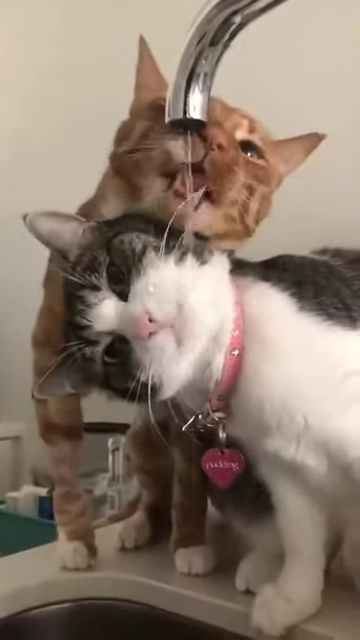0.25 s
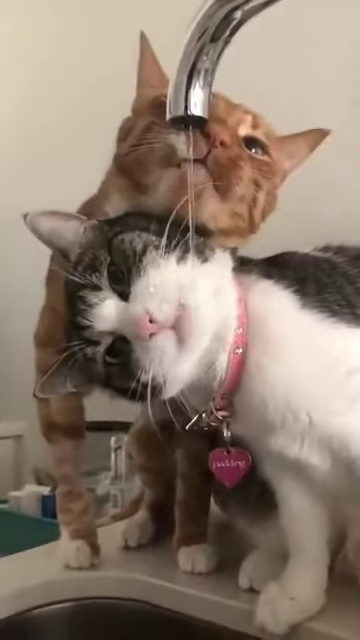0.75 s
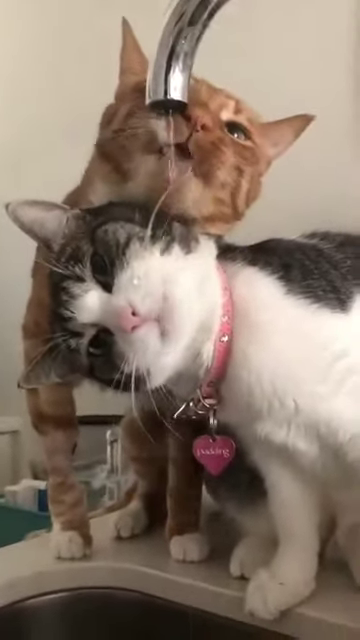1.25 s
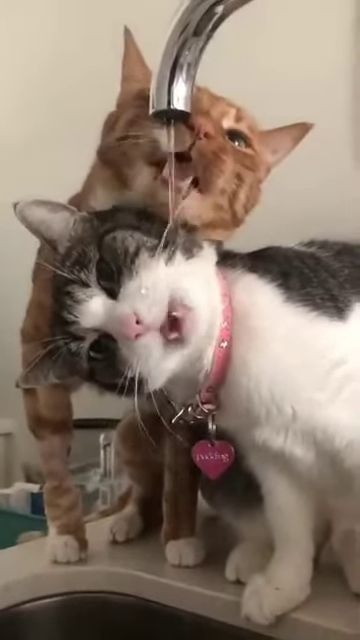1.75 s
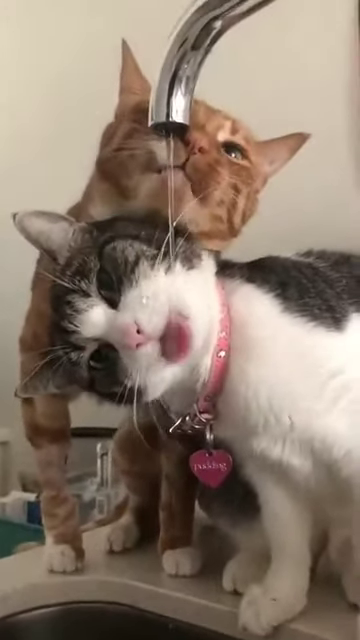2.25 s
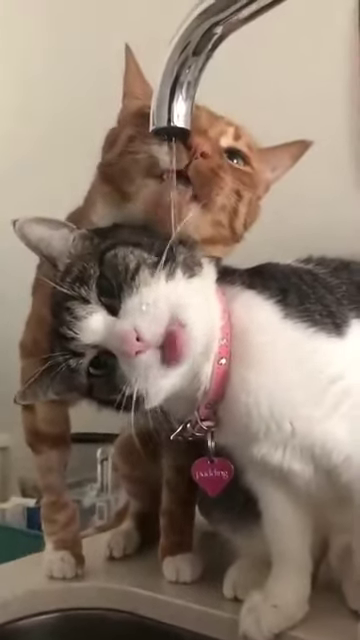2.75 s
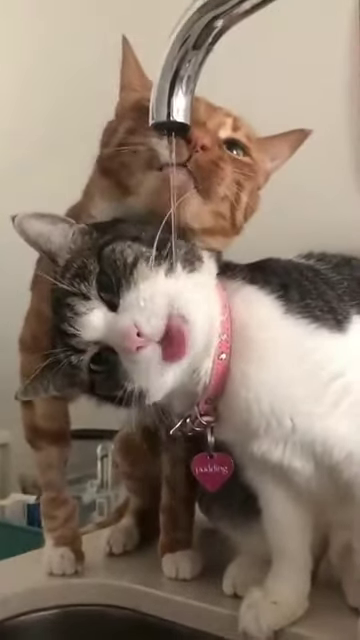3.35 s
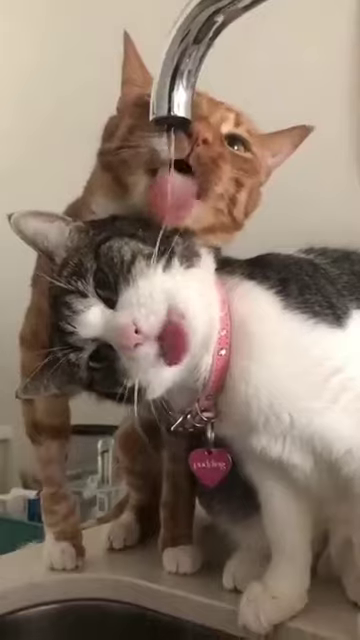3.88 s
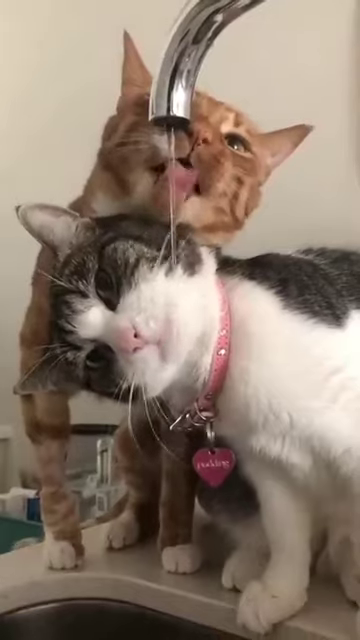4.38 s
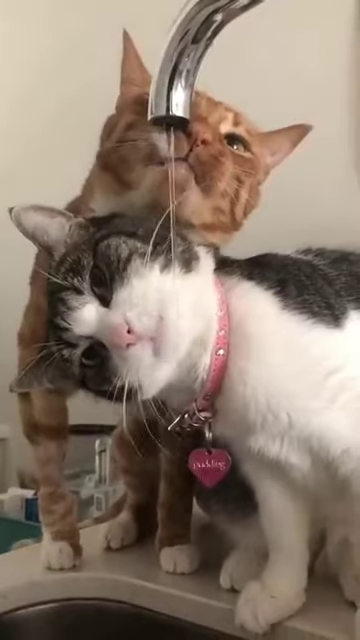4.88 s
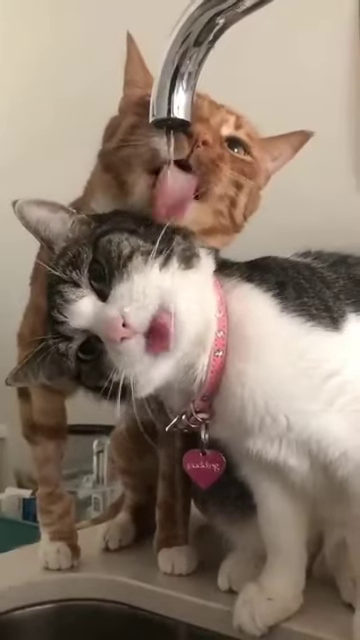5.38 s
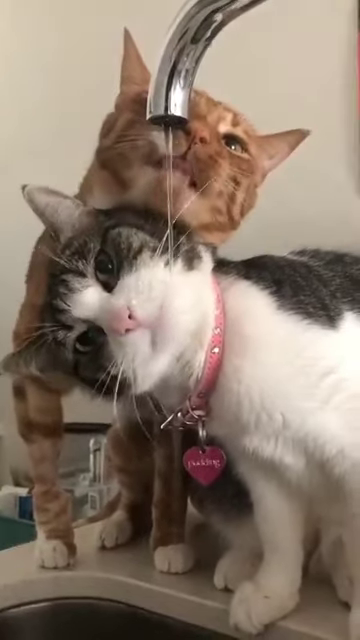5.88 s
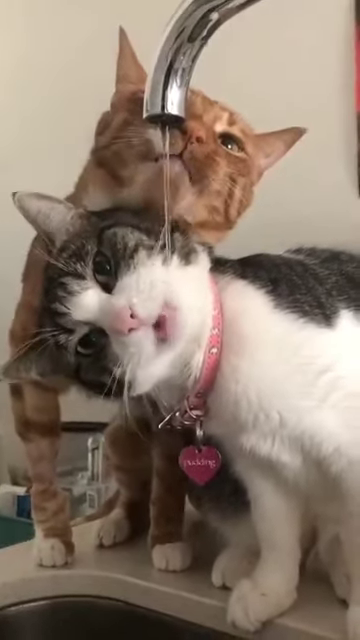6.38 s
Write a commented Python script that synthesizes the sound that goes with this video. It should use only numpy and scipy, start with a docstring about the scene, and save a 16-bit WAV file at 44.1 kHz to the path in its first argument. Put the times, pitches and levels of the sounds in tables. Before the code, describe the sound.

Crisp, irregular licking and fizzy tongue strokes about four times a second, over a faint trickle drumming softly on a metal basin.

```python
"""Cats lapping at a tap

Two cats lap at a thin stream from a kitchen tap, heard from close by in a small room.
Tearing wet films and opening air pockets are noise bursts exciting resonances; each lick adds bubble fizz.
Missed water drums on the steel basin as random impacts, with heavier plops of sinking pitch.
A soft trickle, a faint tone and quiet room air, both shaped from simple signals, lie behind."""
import sys
import numpy as np
from scipy import signal
from scipy.fft import rfft, irfft, next_fast_len
from scipy.io import wavfile
from scipy.ndimage import uniform_filter1d

SR = 44100
rng = np.random.default_rng(int(sys.argv[2]) if len(sys.argv) > 2 else 0)


def to_wav(sig):
    """Store sig (one row per channel, or 1-D mono) as 16-bit WAV at the path in sys.argv[1].

    Samples outside -1..1 are clipped; the rate is SR.
    """
    pcm = np.clip(np.atleast_2d(sig), -1, 1) * 32767
    pcm = np.round(pcm).astype(np.int16)
    wavfile.write(sys.argv[1], SR, pcm.T)  # frames by channels


N = 292412
TIME = np.arange(N) / SR
AGE = TIME[:2048]  # time since the start of a short burst [s]
BLOW_S = .005  # reference length over which the energy of a short sound is spread

# quiet air of the room: (frequency [Hz], relative density [dB per Hz])
ROOM_AIR_SPECTRUM = [(28, -34), (45, -6.5), (75, -5), (110, -4.5), (400, -13.5), (800, -31), (5000, -25),
                     (9000, -28.5), (16000, -36.5)]
# faint tone: (time [s], level [dB], pitch [Hz])
FAINT_TONE = [(1.5, -77, 429), (1.62, -67, 428), (2.05, -75.5, 399), (2.15, -74, 404)]
# deep boom of the basin: (time [s], level [dB])
BASIN_BOOM = [(0.05, -71), (1.55, -64.5), (1.66, -74), (1.99, -53), (2.6, -71), (2.73, -56), (2.78, -67.5),
              (3.2, -66.5), (3.61, -57), (3.65, -72.5), (6.4, -65.5)]
# stream drumming on the basin: (frequency [Hz], relative density [dB per Hz])
DRUMMING_SPECTRUM = [(30, -38), (110, -14.5), (170, -8.5), (210, 1.5), (250, 0), (300, -10.5), (420, -16),
                     (1500, -30), (8000, -41)]
# upper modes of the steel basin: (frequency [Hz])
STEEL_MODES_HZ = [419, 548.7, 620, 864, 1264, 1570]
# heavy wet plops, mostly slugs landing in the basin, some slurps at the mouths: # (time [s], thump [dB],
# starting pitch [Hz], splash [dB], decay length [s])
WET_PLOPS = [(0.517, -47, 297, -47.5, 0.022), (0.55, -43.5, 311, -48, 0.018),
             (1.206, -41, 312.7, -49.5, 0.044), (2.684, -45.5, 239, -83, 0.02),
             (3.325, -42, 249.6, -48, 0.025), (3.589, -60, 390, -50, 0.014),
             (3.97, -52, 242, -52.5, 0.11), (4.642, -62, 680, -50.5, 0.0088),
             (5.818, -41, 374, -48.5, 0.031), (5.863, -43, 375, -74, .04), (5.982, -52, 560, -49, 0.015),
             (6.097, -54, 1010, -46.5, 0.031)]
# crackle of a splash: (frequency [Hz], relative density [dB per Hz])
SPLASH_SPECTRUM = [(200, 3), (550, 8), (900, -2), (1800, -1.5), (3200, -9.5), (7000, -14)]
# tongue strokes through the stream, levels before the gains in licking():
# (start [s], length [s], strength [dB], sizzle [dB])
TONGUE_STROKES = [(0.042, 0.049, -54.5, -56), (0.239, 0.038, -62, -60), (0.311, 0.067, -54.5, -65),
                  (0.523, 0.11, -71, -59), (0.806, 0.1, -63, -54.5), (0.973, 0.047, -54, -66),
                  (1.24, 0.086, -54, -62), (1.434, 0.096, -75, -58), (1.75, 0.12, -66, -70),
                  (2.014, 0.14, -60, -73), (2.257, .17, -58.5, -60), (2.576, 0.063, -68.5, -63.5),
                  (2.77, 0.1, -65, -64), (3.022, 0.1, -58, -63), (3.277, 0.12, -66.5, -68),
                  (3.52, 0.13, -64, -69), (3.85, 0.2, -63, -69), (4.184, 0.14, -61, -65.5),
                  (4.477, .078, -58, -58.5), (4.761, 0.11, -56, -60), (4.949, 0.22, -69.5, -59.5),
                  (5.284, 0.14, -64, -63.5), (5.573, 0.14, -94, -69), (5.668, 0.18, -61.5, -53.5),
                  (5.879, .036, -58, -52), (5.964, 0.14, -73, -61.5), (6.224, 0.2, -62, -56),
                  (6.521, 0.099, -57.5, -60.5)]
# bubbles bursting on tongue and fur: (frequency [Hz], relative density [dB per Hz])
FIZZ_SPECTRUM = [(300, -5), (700, -6.5), (1900, 4.5), (2600, 2.5), (3600, -6.5), (6300, -4.5), (9400, -8.5),
                 (10500, -2)]
# narrow sizzle of a stroke: (frequency [Hz], relative density [dB per Hz])
SIZZLE_SPECTRUM = [(6000, -25), (7600, -12), (8300, -14), (9450, -7.5), (9800, -39), (12000, -23)]
# fine spray of a stroke: (frequency [Hz], relative density [dB per Hz])
SPRAY_SPECTRUM = [(7000, -59), (9500, -2), (10300, 6), (12000, 10), (15500, 8), (17000, -30)]
# pops of air pockets in the mouths: (time [s], level [dB], pitch [Hz])
AIR_POCKETS = [(.081, -51.5, 2400), (.103, -55.5, 610), (.232, -55.5, 1190), (.342, -43, 3100),
               (.707, -55, 1600), (.728, -60, 2170), (.941, -46.5, 2780), (1.112, -58.5, 4170),
               (1.203, -54, 1020), (1.313, -51.5, 1900), (1.48, -54.5, 1860), (1.519, -60, 840),
               (1.606, -57, 3660), (1.764, -62, 1290), (1.863, -50.5, 870), (1.885, -56, 1370),
               (2.121, -49.5, 3000), (2.376, -51.5, 2550), (2.526, -62, 1940), (2.82, -52, 3360),
               (2.918, -57, 3000), (2.96, -49, 3960), (3.059, -53, 2030), (3.204, -55, 890),
               (3.236, -48, 886), (3.513, -58, 4150), (4.21, -47, 3200), (4.39, -53, 2900),
               (4.462, -58.5, 1850), (4.48, -45.5, 2980), (4.558, -55, 1220), (4.589, -58.5, 1520),
               (4.753, -36.5, 3200), (4.829, -55, 1260), (5.009, -54, 1910), (5.287, -55.5, 1930),
               (5.385, -53, 2750), (6.147, -58.5, 1870), (6.307, -64, 1280), (6.348, -42.5, 3060),
               (6.617, -46.5, 1920)]
# loud tears of water films on tongue and lips: (time [s], ring [dB], ring pitch [Hz], bright snap [dB])
FILM_TEARS = [(.0492, -36.5, 8740, -30), (.0623, -41, 6000, -49), (.08, -47, 6160, -54),
              (.2084, -44, 6140, -39.5), (.2122, -36, 5630, -53), (.267, -47, 7490, -64),
              (.3411, -30, 4500, -33), (.4302, -59, 7660, -65), (.563, -44, 6160, -54),
              (.586, -47.5, 8440, -46), (.5933, -39.5, 7400, -47), (.8307, -46, 9100, -41.5),
              (.8495, -41.5, 7000, -41), (.8822, -44.5, 8900, -37), (.9892, -44.5, 6900, -41),
              (1.0026, -39.5, 5150, -64), (1.203, -50, 8550, -38.5), (1.2396, -33, 8400, -32.5),
              (1.2487, -39, 4640, -38), (1.3024, -54, 6890, -53), (1.312, -48, 6250, -58),
              (1.496, -45.5, 4700, -36.5), (1.5042, -46, 8700, -38), (1.7682, -41, 6130, -58),
              (1.7846, -49, 4680, -60), (1.8173, -38, 5770, -50), (1.845, -32.5, 6740, -48),
              (1.872, -42.5, 4570, -60), (1.9041, -40, 8850, -40.5), (2.0181, -51, 5900, -57),
              (2.0371, -35.5, 9300, -41), (2.1207, -48, 7060, -41.5), (2.2455, -49, 7450, -44),
              (2.2616, -35, 5970, -43), (2.291, -36.5, 4800, -41), (2.3173, -39.5, 6600, -47),
              (2.3584, -48.5, 7100, -56), (2.4017, -52, 7000, -54), (2.435, -39, 6700, -66),
              (2.6043, -44, 6700, -50), (2.642, -69, 9300, -40.5), (2.791, -44, 5100, -44.5),
              (2.8423, -35, 5600, -44), (2.947, -76, 7500, -39.5), (3.0313, -36, 8600, -25),
              (3.2903, -42, 6400, -51), (3.3489, -37, 6260, -43.5), (3.3773, -36.5, 4630, -45),
              (3.39, -45, 7700, -46), (3.526, -49.5, 10100, -39.5), (3.579, -56, 4600, -42.5),
              (3.6278, -41, 7800, -56), (3.65, -39, 4240, -38.5), (3.758, -47, 6300, -52),
              (3.7693, -46, 6540, -50), (3.8381, -28, 5350, -28), (3.863, -43.5, 4740, -46),
              (3.8959, -32.5, 4780, -45.5), (4.022, -67, 10300, -37.5), (4.1957, -42, 8300, -40),
              (4.2104, -39.5, 7450, -58), (4.2338, -59, 7400, -58), (4.2478, -43, 9300, -38),
              (4.479, -39.5, 6500, -38), (4.517, -65, 7600, -56), (4.5312, -41.5, 8300, -40),
              (4.545, -44, 5800, -54), (4.6973, -46.5, 7360, -41), (4.7505, -31, 6770, -26),
              (4.821, -42.5, 9900, -40), (4.956, -47, 8960, -60), (4.975, -46.5, 6700, -54),
              (5.076, -46.5, 7540, -52), (5.153, -42, 7800, -41.5), (5.2865, -44.5, 9300, -42.5),
              (5.3433, -52, 9300, -41), (5.4039, -48, 6450, -41.5), (5.422, -54.5, 4640, -52),
              (5.5328, -55, 7500, -49), (5.5894, -46.5, 8040, -43), (5.642, -48, 7860, -45),
              (5.717, -48, 6300, -61), (5.7591, -38.5, 8500, -43), (5.787, -49, 5630, -44),
              (5.8316, -37, 5600, -46), (5.9307, -36, 5100, -38), (5.989, -48, 8180, -44),
              (6.0895, -41, 4470, -34.5), (6.103, -50, 5950, -51), (6.137, -45, 6940, -49),
              (6.239, -54, 9200, -43), (6.2922, -38.5, 5770, -41), (6.3128, -52, 7580, -52),
              (6.3484, -36.5, 9700, -38), (6.3906, -37.5, 4780, -43), (6.546, -43.5, 7300, -46),
              (6.5734, -47, 7300, -39.5), (6.6154, -37.5, 5000, -46)]
# resonances of the wet mouths: (frequency [Hz], mean relative level [dB])
MOUTH_RESONANCES = [(3300, -1), (4650, 9), (5600, 3.5), (6400, 12.5), (7420, 13.5), (9330, 9.5)]
# narrow dips in the treble: (frequency [Hz])
TREBLE_DIPS_HZ = [2823, 4000, 5190, 6700, 7800, 10080]

ROOM_T60_S, ROOM_DB = .22, -14.3
BASIN_HZ, BASIN_WIDTH_HZ = 133, 12
MOUTH_WIDTH_HZ, STEEL_WIDTH_HZ = 240, 14
DIP_DB, DIP_WIDTH_HZ, CUTOFF_HZ = -8, 200, 15750
# every lick knocks water out of the stream, which then lands harder for a moment
SPILL_RISE_S, SPILL_FALL_S = .0033, .045
# drumming between licks; what a full spill adds to drumming and to trickle
POUR_DB, SPILL_DRUM_DB, SPILL_TRICKLE_DB = -60.5, 2.5, 7
# fizz of a usual lick; share of a lick's extra strength that the fizz takes on
USUAL_LICK_DB, FIZZ_DB, FIZZ_FOLLOWS = -60, -60.5, .4
LICK_SAG_DB_PER_S = 20  # a stroke weakens as the tongue draws back
# small smacks: levels above the stroke's strength, random spread either way, range of pitch
TICK_RING_DB, TICK_SNAP_DB, TICK_SPREAD_DB = 2.5, 4.5, 1.5
TICK_LOW_HZ, TICK_HIGH_HZ = 3200, 9300


def from_db(db):
    """Logarithmic level: 20 dB is a factor of ten in amplitude."""
    return 10 ** (np.asarray(db) / 20)


def rms_one(x):
    """Normalisation: scale to a root mean square of 1."""
    return x / np.sqrt(np.mean(x ** 2) + 1e-20)


def in_time(rows):
    """Linear interpolation: each column of a curve at every sample."""
    s, *columns = np.transpose(rows)
    return [np.interp(TIME, s, column) for column in columns]


def add(out, s, level_db, sound):
    """Superposition: mix in a short sound, its level set by its energy spread over one blow length."""
    start = max(round(s * SR), 0)
    part = sound[:N - start] / np.sqrt(np.sum(sound ** 2) / (BLOW_S * SR))
    out[start:start + len(part)] += from_db(level_db) * part


def resonate(x, hz, width_hz):
    """Damped resonance: a pole pair with a gain of about 1 on top."""
    radius = np.exp(-np.pi * width_hz / SR)
    zeros = np.array([1, 0, -1]) * (1 - radius ** 2) / 2
    poles = [1, -2 * radius * np.cos(2 * np.pi * hz / SR), radius ** 2]
    return signal.lfilter(zeros, poles, x)


def high_pass(x, hz, order):
    """Butterworth high-pass: a smooth passband above the corner."""
    return signal.sosfilt(signal.butter(order, hz, "high", fs=SR, output="sos"), x)


def colour(x, spectrum):
    """Spectral shaping: weight the frequencies of a steady sound; rms 1."""
    hz, level_db = np.transpose(spectrum)
    size = next_fast_len(N, real=True)
    bins = np.maximum(np.fft.rfftfreq(size, 1 / SR), 1)
    gains = from_db(np.interp(np.log(bins), np.log(hz), level_db))
    return rms_one(irfft(rfft(x, size) * gains, size)[:N])


def flutter(depth_db, hz):
    """Random amplitude modulation: a gain wavering up to about hz times a second; rms 1."""
    slow = signal.sosfilt(signal.butter(2, hz, fs=SR, output="sos"), rng.standard_normal(N))
    return rms_one(from_db(depth_db * np.clip(rms_one(slow), -2, 2)))


def droplets(per_s, spread_db, smooth_db):
    """Shot noise: random tiny impacts of uneven size on a bed of countless smaller ones."""
    sizes = from_db(spread_db * np.minimum(rng.exponential(1, N), 3.5))
    clicks = (rng.random(N) < per_s / SR) * sizes * rng.choice([-1, 1], N)
    return rms_one(clicks) + from_db(smooth_db) * rng.standard_normal(N)


def bubbles(per_s, low_hz, high_hz, width_share, count=26):
    """Bubble resonance: random bursts each ring a few cycles at the pitch of their size; rms 1."""
    sizes = from_db(4 * np.minimum(rng.exponential(1, N), 3)) * rng.choice([-1, 1], N)
    clicks = (rng.random(N) < per_s / SR) * sizes
    dealt = rng.integers(0, count, N)  # which pitch each bubble gets
    ringing = np.zeros(N)
    for k, hz in enumerate(np.geomspace(low_hz, high_hz, count)):
        chosen = clicks * (dealt == k) + 1e-18
        ringing += resonate(chosen, hz, width_share * hz) / np.sqrt(hz)
    return rms_one(ringing)


def bursts(count, rise_s, linger_s):
    """Rupture noise: each row is a brief tearing noise, then a weaker, uneven splutter."""
    shape = (AGE / rise_s) ** 2 * np.exp(2 - 2 * AGE / rise_s)  # peaks at rise_s
    wander = uniform_filter1d(rng.standard_normal((count, len(AGE))), size=50)
    uneven = from_db(4.5 * rms_one(wander))
    splutter = .25 * uneven * np.exp(-AGE / linger_s) * (1 - np.exp(-AGE / rise_s))
    return rng.standard_normal((count, len(AGE))) * (shape + splutter)


def steel(x):
    """Modal ringing: the basin's upper modes ring on after a blow, the higher the weaker."""
    ringing = np.zeros(len(x))
    for k, hz in enumerate(STEEL_MODES_HZ):
        ringing += (-1) ** k * resonate(x, hz, STEEL_WIDTH_HZ) * STEEL_MODES_HZ[0] / hz
    return ringing


def stroke(start, length, rise_s, fall_s):
    """Envelope: attack, hold and release of one lick, 0 to 1."""
    end = start + length
    return np.interp(TIME, [start - rise_s, start, end, end + fall_s], [0, 1, 1, 0])


def spill():
    """Deflected flow: how much water the tongues are knocking aside, 0 to 1."""
    return np.max([stroke(start, length, SPILL_RISE_S, SPILL_FALL_S)
                   for start, length, *_ in TONGUE_STROKES], axis=0)


def room_air(level_db=-65.0):
    """Stationary noise: the quiet room is random noise with a fixed spectrum."""
    return from_db(level_db) * colour(rng.standard_normal(N), ROOM_AIR_SPECTRUM)


def faint_tone():
    """Phase accumulation: summing a varying frequency gives a sine that swells, sinks a little and stops."""
    level_db, hz = in_time(FAINT_TONE)
    sounding = (TIME > FAINT_TONE[0][0]) & (TIME < FAINT_TONE[-1][0])
    tone = np.sqrt(2) * np.sin(2 * np.pi * np.cumsum(hz) / SR)
    return sounding * from_db(level_db) * tone


def kitchen(x, first_echo_s=.0013):
    """Reverberation: convolution with decaying noise, dense echoes from counter and near walls."""
    age = TIME[:SR // 2]
    build_up = 1 - np.exp(-(age / first_echo_s) ** 2)
    tail = rng.standard_normal(len(age)) * from_db(-60 * age / ROOM_T60_S) * build_up
    return signal.fftconvolve(x, tail / np.sqrt(np.sum(tail ** 2)))[:N]


def trickle(patter_db=-78, burble_db=-78, steel_db=-77):
    """Bubble and modal sound: the stream patters and burbles to the drain while the steel sings faintly."""
    patter = bubbles(per_s=200, low_hz=900, high_hz=9000, width_share=.12)
    burble = bubbles(per_s=130, low_hz=450, high_hz=1900, width_share=.08)
    ringing = rms_one(steel(rng.standard_normal(N)))
    flow = from_db(patter_db) * patter + from_db(burble_db) * burble
    return flow * flutter(depth_db=4, hz=5.8) + from_db(steel_db) * ringing


def basin(spilled):
    """Forced vibration: the stream drums on the steel, harder with every spill, and the lowest mode booms."""
    boom_db, = in_time(BASIN_BOOM)
    drumming = from_db(POUR_DB + SPILL_DRUM_DB * spilled) * flutter(depth_db=3, hz=10)
    patter = droplets(per_s=210, spread_db=-.5, smooth_db=3)
    boom = resonate(resonate(patter, BASIN_HZ, BASIN_WIDTH_HZ), BASIN_HZ, 2 * BASIN_WIDTH_HZ)
    # the stream pushes steadily, so the boom keeps an even strength
    boom = boom / np.sqrt(uniform_filter1d(boom ** 2, size=3000) + 1e-12)
    return drumming * colour(patter, DRUMMING_SPECTRUM) + from_db(boom_db) * boom


def plops(sag_per_s=7, wobble=.22, overtone_db=-8, steel_db=4):
    """Wet impact: a hollow gulp sinks in pitch as it spreads, and its splash sets the steel ringing."""
    gulps, splashes = np.zeros((2, N))
    crackle = colour(droplets(per_s=1200, spread_db=2.5, smooth_db=-4), SPLASH_SPECTRUM)
    age = TIME[:SR // 5]
    for s, thump_db, hz, splash_db, length_s in WET_PLOPS:
        swell = (1 - np.exp(-(age / .0025) ** 2)) * np.exp(-(age / length_s) ** 2)
        settling = .25 * np.exp(-age / (2 * length_s)) * (1 - np.exp(-age / length_s))
        envelope = swell + settling
        slosh, churn = rms_one(uniform_filter1d(rng.standard_normal((2, len(age))), size=140))
        sinking_hz = hz * np.exp(-sag_per_s * np.minimum(age, 2 * length_s))
        phase = 2 * np.pi * np.cumsum(sinking_hz) / SR
        gulp = (1 + wobble * slosh) * np.sin(phase + wobble * churn)
        gulp += from_db(overtone_db) * churn * np.sin(2 * phase)
        add(gulps, s, thump_db, envelope * gulp)
        add(splashes, s, splash_db, envelope * crackle[round(s * SR):][:len(age)])
    return gulps + splashes + from_db(steel_db) * steel(splashes)


def tongue_splutter():
    """Stick and slip: the rough tongue catches and lets go at random, a gain of rms 1."""
    catches = (rng.random(N) < 45 / SR) * rng.uniform(1, 3, N)
    ticks = signal.fftconvolve(catches, AGE / .001 * np.exp(1 - AGE / .001))[:N]
    return rms_one(flutter(depth_db=3.3, hz=25) + ticks)


def licking(swell_s=.015, fade_s=.054, arch_db=5, sizzle_gain_db=-1, spray_gain_db=-2.5):
    """Stream break-up: a tongue cutting the water makes bubble fizz, narrow sizzle and fine spray."""
    strokes = np.zeros((3, N))
    for start, length, strength_db, sizzle_db in TONGUE_STROKES:
        span = (TIME > start - swell_s) & (TIME < start + length + fade_s)
        from_middle = TIME[span] - start - length / 2
        arch = np.cos(np.pi * from_middle / (length + fade_s)) ** 2 - .5
        contact = stroke(start, length, swell_s, fade_s)[span] ** 2
        contact = contact * from_db(arch_db * arch - LICK_SAG_DB_PER_S * from_middle)
        levels_db = [FIZZ_DB + FIZZ_FOLLOWS * (strength_db - USUAL_LICK_DB),
                     sizzle_db + sizzle_gain_db, strength_db + spray_gain_db]
        # where strokes overlap, the stronger one counts
        strokes[:, span] = np.maximum(strokes[:, span], from_db(levels_db)[:, None] * contact)
    wash = .45 * rng.standard_normal(N)
    fizz = bubbles(per_s=560, low_hz=3200, high_hz=9500, width_share=.09)
    fizz = colour(fizz + wash, FIZZ_SPECTRUM)
    sizzle = bubbles(per_s=1800, low_hz=6500, high_hz=9800, width_share=.04)
    sizzle = colour(sizzle + wash, SIZZLE_SPECTRUM) * flutter(depth_db=3, hz=40)
    spray = bubbles(per_s=3000, low_hz=9800, high_hz=16000, width_share=.05)
    spray = colour(spray + wash, SPRAY_SPECTRUM) * flutter(depth_db=2.5, hz=30)
    # all three splutter together
    return tongue_splutter() * np.sum(strokes * [fizz, sizzle, spray], axis=0)


def pops(rows, overtone_ratio=1.455, overtone_db=-5, opening_cycles=3.674):
    """Cavity resonance: air pockets open between tongue and palate with a squelch; the bigger, the slower."""
    out = np.zeros(N)
    opening_s = opening_cycles / np.array(rows)[:, 2:]
    tears = bursts(len(rows), rise_s=opening_s, linger_s=.005)
    for (s, level_db, hz), tear in zip(rows, tears):
        width_hz = .13 * hz
        pocket = resonate(tear, hz, width_hz)
        pocket += from_db(overtone_db) * resonate(tear, overtone_ratio * hz, width_hz)
        add(out, s - opening_cycles / hz - .001, level_db, pocket)
    return out


def mouth_ring(tear, size_spread=.031, spread_db=3):
    """Formants: the mouth's damped resonances, shifted and weighted anew as the jaw and tongue move."""
    stretch = np.exp(size_spread * rng.uniform(-.8, 1))
    ringing = np.zeros(len(tear))
    for k, (hz, mean_db) in enumerate(MOUTH_RESONANCES):
        gain = from_db(mean_db + spread_db * rng.standard_normal())
        ringing += (-1) ** k * gain * resonate(tear, hz * stretch, MOUTH_WIDTH_HZ)
    return ringing


def small_smacks(count=3):
    """Random film rupture: a few lesser films tear during each stroke; rows like those of FILM_TEARS."""
    rows = []
    for start, length, strength_db, _ in TONGUE_STROKES:
        for when, pitch, size in rng.random((count, 3)):
            level_db = strength_db + TICK_SPREAD_DB * (2 * size - 1)
            hz = TICK_LOW_HZ * (TICK_HIGH_HZ / TICK_LOW_HZ) ** pitch
            rows.append((start + when * length, level_db + TICK_RING_DB, hz, level_db + TICK_SNAP_DB))
    return rows


def smacks(rows, ring_width_hz=1200, mouth_db=-2, ring_lead_s=.0011, slowing=.41):
    """Film rupture: a tear rings a tiny cavity and the mouth under a bright snap; slack films snap slowly."""
    out = np.zeros(N)
    brights_db = np.array(rows)[:, -1:]
    snap_s = .0014 * from_db(slowing * (brights_db.max() - brights_db))  # softer snaps rise slower
    tears = high_pass(bursts(len(rows), rise_s=.0008, linger_s=.004), 2800, order=2)
    snaps = high_pass(bursts(len(rows), rise_s=snap_s, linger_s=.006), 9800, order=6)
    for (s, level_db, hz, bright_db), tear, snap, rise_s in zip(rows, tears, snaps, snap_s.ravel()):
        cavity = resonate(resonate(tear, hz, ring_width_hz), hz, 4 * ring_width_hz)
        ring = rms_one(cavity) + from_db(mouth_db) * rms_one(mouth_ring(tear))
        add(out, s - ring_lead_s, level_db, ring)
        add(out, s - rise_s, bright_db, snap)
    return out


def scene():
    """Superposition of sources: room air, tone, basin and water, with cats close by; the water echoes."""
    spilled = spill()
    background = room_air() + faint_tone() + basin(spilled)
    mouths = smacks(FILM_TEARS + small_smacks()) + pops(AIR_POCKETS) + licking()
    water = mouths + plops() + from_db(SPILL_TRICKLE_DB * spilled) * trickle()
    return (background + water + from_db(ROOM_DB) * kitchen(water))[None]


def record(dry, gain_db=.04):
    """Linear filtering: the treble has a few fixed narrow dips, and the top is cut steeply."""
    for hz in TREBLE_DIPS_HZ:
        dry = dry - (1 - from_db(DIP_DB)) * resonate(dry, hz, DIP_WIDTH_HZ)
    steep_cut = signal.ellip(10, .1, 80, CUTOFF_HZ, fs=SR, output="sos")
    return from_db(gain_db) * signal.sosfilt(steep_cut, dry)


dry = scene()
out = record(dry)
to_wav(out)
```